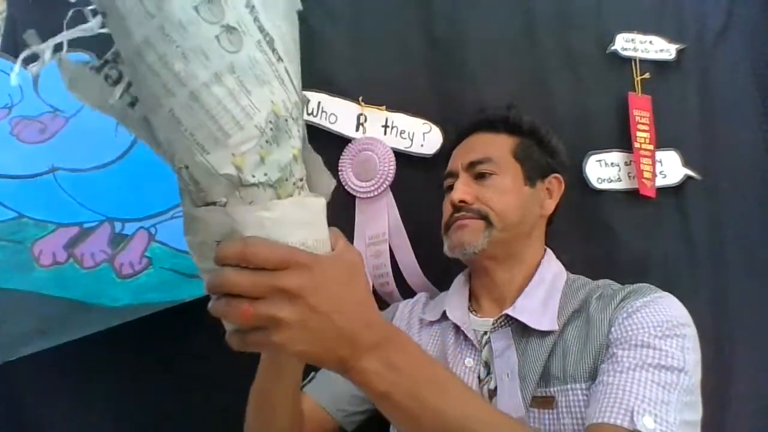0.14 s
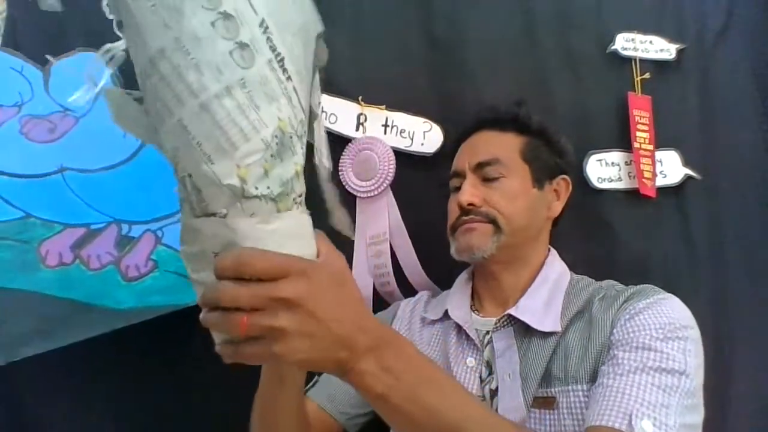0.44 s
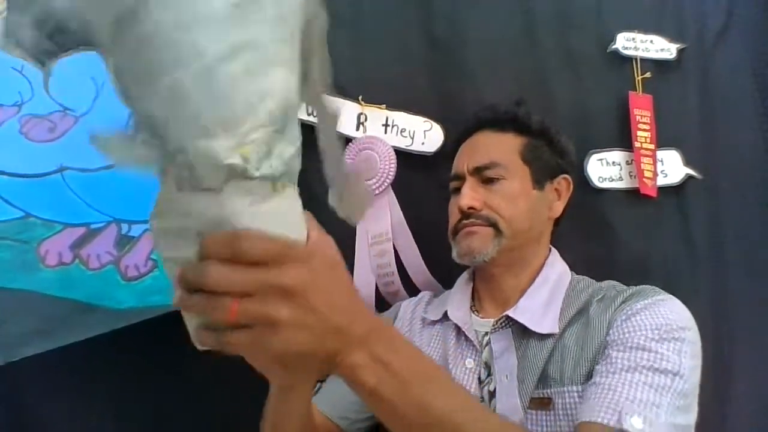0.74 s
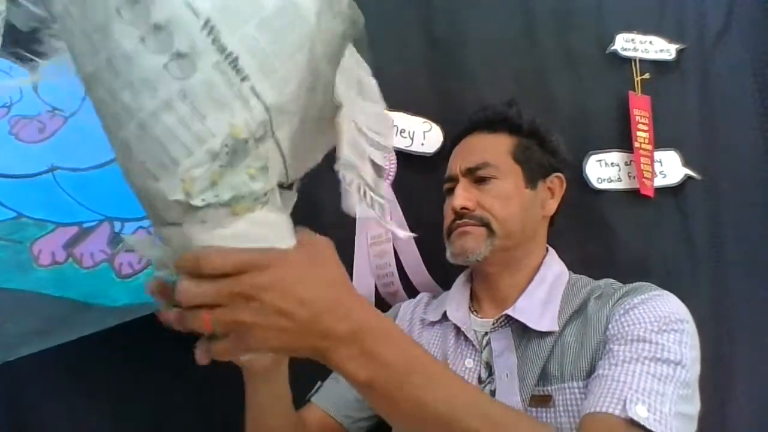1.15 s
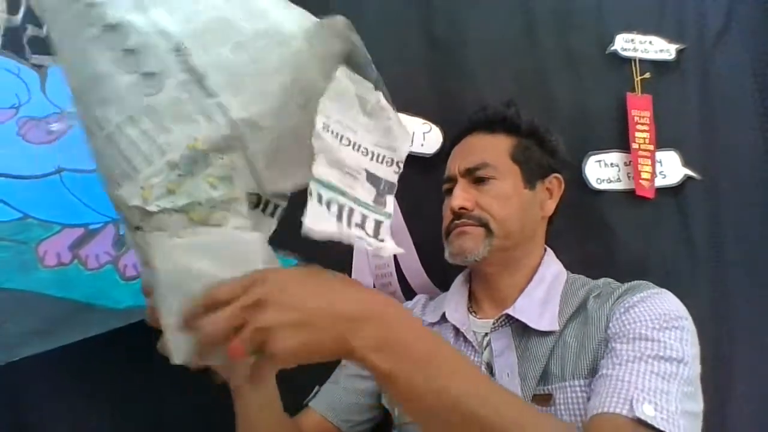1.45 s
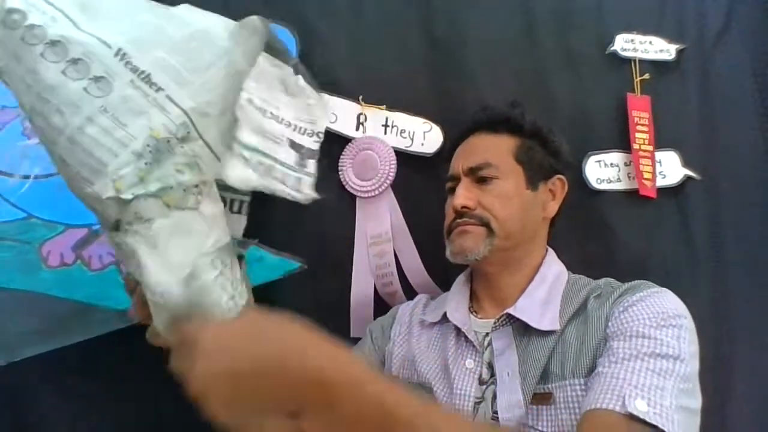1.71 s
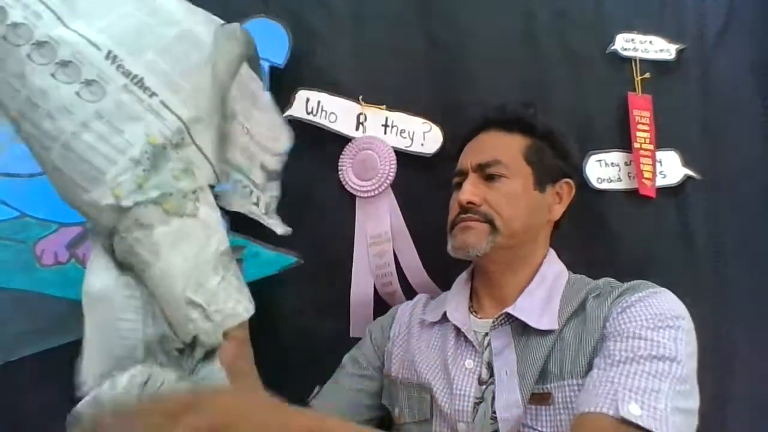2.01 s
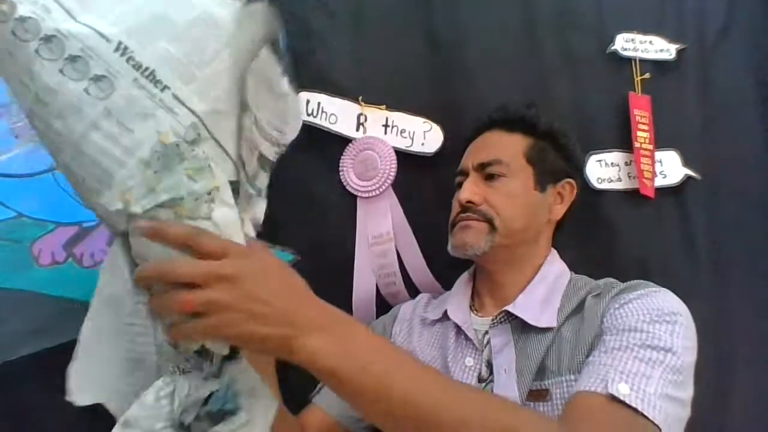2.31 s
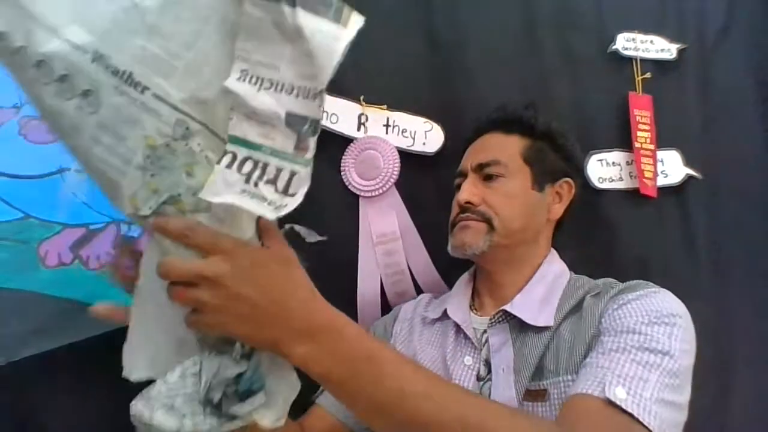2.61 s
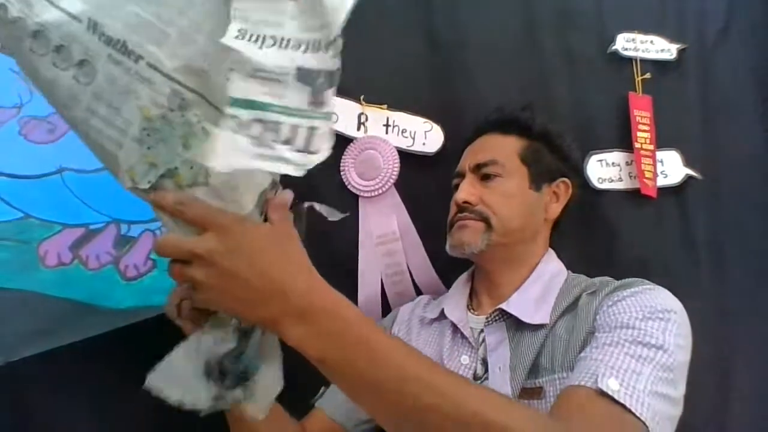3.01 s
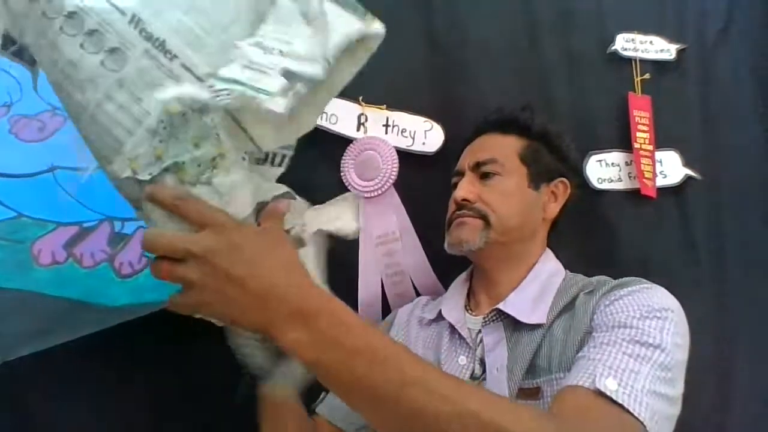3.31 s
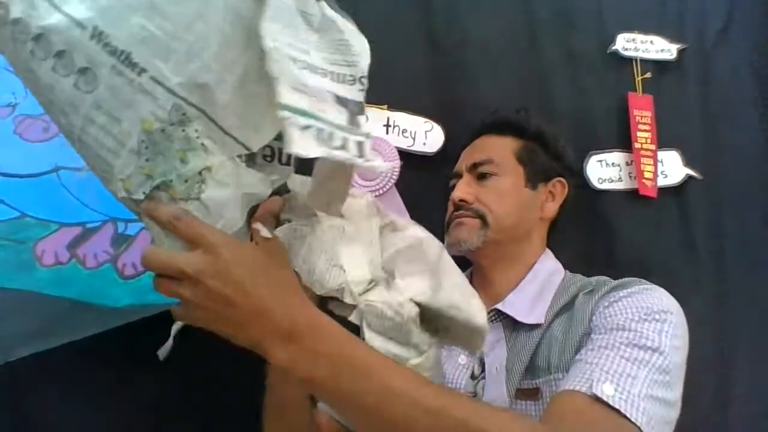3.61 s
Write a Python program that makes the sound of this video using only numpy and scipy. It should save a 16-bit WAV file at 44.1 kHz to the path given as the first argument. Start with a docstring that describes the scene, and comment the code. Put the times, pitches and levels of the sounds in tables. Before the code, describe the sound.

Newspaper is pulled and crumpled close to the microphone in uneven, crackly rustles indoors

```python
"""Newspaper is pulled off a plant and crumpled, close to a microphone in a small, dry room.
Each pull or squeeze drives a swarm of tiny noise grains, split into body, crackle and fizz.
Single large creases snap as short noise bursts with a ringing facet, and the paper cone knocks
hollowly as decaying sines. The swung sheet pushes one puff of low noise at the microphone,
over steady room noise."""
import sys
import numpy as np
from scipy import signal
from scipy.fft import rfft, irfft
from scipy.io import wavfile
from scipy.ndimage import map_coordinates

SR = 44100
rng = np.random.default_rng(int(sys.argv[2]) if len(sys.argv) > 2 else 0)


def wav_out(sig):
    """Save sig, one row per channel (or a flat mono array), as 16-bit PCM at SR to the path in sys.argv[1]."""
    wavfile.write(sys.argv[1], SR, np.round(np.clip(np.atleast_2d(sig).T, -1, 1) * 32767).astype(np.int16))


N = 165375

# Pulls and squeezes, with band levels ahead of the paper colour: (start [s], attack [s], hold [s],
# release per 20 dB [s], body level [dB], crackle level [dB], fizz level [dB])
STROKES = [(0, 0.0092, 0.143, 0.57, -46, -39.5, -37), (0.199, 0.0099, 0.0732, 0.19, -45.5, -34, -35),
           (0.33, 0.016, 0.016, 1.38, -51.5, -41.5, -41), (0.503, 0.021, 0.0437, 0.07, -36, -27, -28),
           (0.599, 0.0135, 0.0104, 0.02, -40.5, -34, -40.5), (0.646, 0.0067, 0.0814, 0.3186, -33, -23, -23),
           (0.761, 0.0207, 0.0133, 0.1074, -25.5, -28, -32),
           (0.839, 0.0157, 0.0326, 0.1587, -31, -23.5, -22.5),
           (0.944, 0.0242, 0.0228, 0.1, -35, -29, -32.5), (1.002, 0.058, 0.112, 0.522, -39, -32, -29),
           (1.189, 0.0122, 0.0135, 0.02, -36, -34.5, -28), (1.29, 0.061, 0.046, 0.11, -44, -33, -35.5),
           (1.43, 0.0333, 0.0737, 0.1312, -34, -23, -22), (1.586, 0.0176, 0.019, 0.34, -39.5, -27, -28.5),
           (1.662, 0.1493, 0.0441, 0.037, -30.5, -23.5, -19.5),
           (1.83, 0.0126, 0.0664, 0.075, -31, -29, -33.5),
           (1.896, 0.0192, 0.0436, 0.1364, -30.5, -31, -28.5),
           (1.959, 0.015, 0.0196, 0.14, -38, -30.5, -26), (2.02, 0.0106, 0.0143, 0.12, -43.5, -40.5, -40.5),
           (2.197, 0.052, 0.012, 0.5, -47, -43, -41), (2.264, 0.02, 0.018, 0.1521, -33, -30.5, -22.5),
           (2.303, 0.0195, 0.0173, 0.277, -34.5, -32, -34),
           (2.405, 0.0555, 0.0178, 0.126, -40.5, -32.5, -29),
           (2.552, 0.0175, 0.043, 0.2, -44.5, -41, -36.5), (2.604, 0.0072, 0.0158, 0.0833, -32, -26, -27),
           (2.736, 0.0125, 0.011, 0.16, -35.5, -34, -31), (2.814, 0.0093, 0.067, 0.135, -28, -22.5, -22),
           (2.918, 0.0337, 0.0066, 0.1336, -27, -23, -22), (3.038, 0.0383, 0.094, 0.1752, -32, -28.5, -26),
           (3.226, 0.036, 0.031, 0.1274, -36, -32.5, -29.5), (3.37, 0.0785, 0.031, 0.0041, -42, -34, -32),
           (3.438, 0.0175, 0.0076, 0.17, -37, -31, -26.5), (3.622, 0.051, 0.084, 0.94, -45, -37, -37)]
# Large creases snapping: (start [s], energy [dB], ring pitch [Hz], # ring share of energy [0-1], decay time
# constant [ms])
SNAPS = [ (.0404, -1.5, 14500, 0.25, 2.5), (.2059, -1, 784, 0.41, 2.3), (.211, -4.5, 1850, 0.51, 2.2),
         (0.2666, -9.5, 4000, .3, 0.93), (0.366, 2.5, 3610, 0.14, 1.52), (0.4508, -2, 14060, 0.67, 1.83),
         (0.511, -5.5, 12000, 0.23, 1.35), (.6212, -8.5, 2400, 0.5, 1.66), (.654, -2.5, 4000, 0.34, 2.44),
         (.661, 3.5, 3690, 0.42, 2.9), (0.68, 3, 3600, 0.13, 2.3), (.7479, 4, 3100, 0.29, 2.34),
         (.7874, 1.5, 1684, 0.94, 2.17), (.8067, 3, 598, 0.61, 1.8), (.907, 3.5, 5800, 0.55, 1.35),
         (0.9688, 1, 3310, 0.3, 1.52), (1.2049, 1.5, 14500, 0.3, 2.6), (1.2243, -1, 5500, 0.72, 1.96),
         (1.2589, -6, 11000, 0.28, 0.84), (1.4209, -2, 2240, 0.38, 1.2), (1.5126, 5.5, 14000, 0.21, 1.97),
         (1.5258, 9.5, 2210, 0.49, 1.26), (1.532, -5, 9000, 0.36, 0.87), (1.5353, 6, 14000, 0.3, 1.52),
         (1.5728, 7.5, 4960, 0.55, 1.4), (1.6159, -1, 12500, 0.24, 0.73), (1.6209, 1.5, 13500, 0.23, 0.97),
         (1.6482, 6.5, 9940, 0.85, 2.3), (1.6964, 0, 2460, 0.49, 1.6), (1.7353, 9, 12500, 0.35, 2.94),
         (1.7676, 2, 15000, 0.32, 0.92), (1.805, 12.5, 10900, 0.35, 2.1), (1.812, 7.5, 11600, 0.33, 1.76),
         (1.8484, 12.5, 9060, 0, 2.4), (1.8544, 10, 934, 0.54, 1.7), (1.9192, 5, 2690, 0.75, 1.32),
         (1.9267, 9.5, 3276, 0.44, 0.68), (1.9321, -1.5, 9000, 0.08, 0.74), (1.9418, 0, 6000, 0.47, 1.75),
         (2.1655, -5.5, 10400, 0.46, 3.54), (2.1743, -11, 4900, 0.72, 2.2), (2.2855, 1, 11000, 0.4, 2.1),
         (2.3185, 11, 5400, 0.53, 1.09), (2.3397, 1, 1700, 0.49, 1.4), (2.352, 7, 1810, 0.91, 1.6),
         (2.4099, -1, 11000, 0.43, 0.98), (2.4116, 2.5, 5020, 0.51, 2.6), (2.5562, -8, 12000, 0.42, 0.96),
         (2.616, 2, 1400, 0.53, 2), (2.6196, 3.5, 9500, 0.44, 0.76), (2.6333, 8, 3030, 0.65, 2.47),
         (2.7987, 0.5, 7600, 0.45, 1.5), (2.83, 14.5, 12600, 0.29, 2.9), (2.8445, 4.5, 11000, 0.3, 1.75),
         (2.8676, 4, 10300, 0.6, 1.65), (2.88, 7, 2880, 0.17, 3.5), (2.8895, 3, 4500, 0.42, 1.17),
         (2.9451, 3, 4200, .3, 1.45), (2.9567, 11.5, 3140, 0.04, 2.7), (2.9642, 9.5, 13000, 0.33, 2.2),
         (3.1156, 1, 2500, 0.29, 1.9), (3.1668, -6.5, 14600, 0.73, 2.2), (3.4612, 4.5, 2500, 0.28, 3.4),
         (3.6305, -12, 2300, 0.09, 2.04), (3.7053, -8.5, 6460, 0.54, 1.4)]
# Hollow knocks of the paper cone: (start [s], pitch [Hz], level before envelope [dB], T60 [s])
KNOCKS = [(.788, 517.7, -19, 0.078), (1.849, 1168, -18.5, 0.079), (1.852, 770.4, -18, 0.063),
          (1.9205, 542, -18.5, 0.037), (1.99, 130.4, -28.5, 0.093), (2.3879, 405, -18, 0.028),
          (2.46, 136.4, -31, 0.107), (2.758, 210.6, -24.5, 0.0535), (2.878, 130.7, -27.5, 0.07),
          (2.965, 311.5, -15.5, 0.0593), (2.991, 332.6, -20, 0.081), (3.015, 283.4, -22, 0.067),
          (3.519, 119, -36, 0.104)]
# Colour of the paper: (frequency [Hz], gain [dB])
PAPER_COLOUR = [(100, -1.5), (300, 0.5), (450, -3), (750, -3), (1100, -3.5), (1600, -3.5), (2600, -2.5),
                (4000, -3.5), (6500, -1.01), (10000, 0.31), (13000, 1.25), (15500, 3)]
# The held paper never quite rests: (body level [dB], crackle level [dB], fizz level [dB])
RESTLESS_DB = [-51, -46.5, -45.5]
# Spectral shape of the room noise: (frequency [Hz], relative level per Hz [dB])
ROOM_NOISE_COLOUR = [(20, 1.5), (45, -0.5), (100, -3), (200, -10.5), (400, -14.5), (1000, -20),
                     (4000, -25.5), (16000, -33)]

# Swarm of tiny creases; spreads are random deviations in dB
CREASES_PER_S, CREASE_SPREAD_DB, CREASE_DECAY_S = 2800, 5, 0.000569
RUB_DB, FLUTTER_DB, FLUTTER_PER_S = -2, 1.0, 110  # sheet rubs on sheet, unevenly
PATCHY_DB, PATCHES_PER_S = 2, 45  # resonances come and go as the sheet bends
# Middling creases; their level is relative to the swarm
TICKS_PER_S, TICK_DB, TICK_SPREAD_DB, TICK_DECAY_S = 130, -11, 4, 0.001365
TICK_LOW_HZ, TICK_HIGH_HZ, TICK_Q = 681, 14000, 2.67
BODY_LOW_HZ, BODY_TOP_HZ, CRACKLE_TOP_HZ = 260.6, 1241, 4946  # band edges
THUD_TOP_HZ, THUD_BASS_HZ, THUD_DB = 276, 89.3, -10.5  # level relative to the body
ROOM_NOISE_DB = -46
ROOM_T60_S, ROOM_TREBLE_T60_S, ROOM_SPLIT_HZ, ROOM_GAP_S = 0.31, 0.155, 4030, .004
ROOM_DB, ROOM_TREBLE_DB = -15.5, -19  # tail energy ahead of the band split
RING_Q, SNAP_RISE_S, SNAP_LOW_HZ = 4.96, 0.000096, 406
PUFF_S, PUFF_WIDTH_S, PUFF_DB, PUFF_HZ = 0.805, 0.083, -37.5, 100.4  # centre, sigma, level, cutoff
KNOCK_ATTACK_S = 0.00071
TOP_HZ = 15900


def undb(db):
    """Decibels to gain."""
    return 10 ** (np.asarray(db) / 20)


def unit(x):
    """Scale to rms 1."""
    return x / np.sqrt(np.mean(x ** 2) + 1e-20)


def norm(x):
    """Scale to energy 1."""
    return x / np.sqrt(np.sum(x ** 2) + 1e-20)


def cut(x, hz, kind, order=2):
    """Low-pass or high-pass."""
    return signal.sosfilt(signal.butter(order, hz, kind, fs=SR, output="sos"), x)


def soft(x, hz, kind, order=2):
    """The same filter forwards and backwards, so that bands add up without notches."""
    forwards = cut(x, hz, kind, order)
    return cut(forwards[::-1], hz, kind, order)[::-1]


def colour(x, points):
    """Shape the spectrum by (frequency [Hz], gain [dB]) points."""
    hz, db = np.array(points).T
    f = np.maximum(np.fft.rfftfreq(N, 1 / SR), 1)
    gain = undb(np.interp(np.log(f), np.log(hz), db))
    return irfft(rfft(x) * gain, N)


def walk(rate):
    """Random wander of rms 1, gliding through 'rate' new values a second."""
    position = np.arange(N) / SR * rate
    return unit(map_coordinates(rng.standard_normal(4096), [position], order=1, mode="wrap"))


def swarm(size=128):
    """Tiny creases of very uneven size buckle, no two alike, over the rub of sheet on sheet."""
    count = int(CREASES_PER_S * N / SR)
    places = rng.integers(0, N, count)[:, None] + np.arange(size)
    sizes = undb(CREASE_SPREAD_DB * np.minimum(rng.standard_normal((count, 1)), 2))
    decay = np.exp(-np.arange(size) / SR / CREASE_DECAY_S)
    grains = sizes * rng.standard_normal((count, size)) * decay
    creases = np.bincount(places.ravel(), grains.ravel(), N)[:N]
    rub = undb(RUB_DB) * rng.standard_normal(N)
    flutter = undb(FLUTTER_DB * walk(FLUTTER_PER_S))
    return unit((unit(creases) + rub) * flutter)


def bend(x, count=18):
    """The sheet changes shape, so its resonances come and go in overlapping bands."""
    log_hz = np.log(np.fft.rfftfreq(N, 1 / SR) + 1)
    place = np.interp(log_hz, np.log([200, 16000]), [0, count - 1])
    spectrum = rfft(x)
    out = np.zeros(N)
    for k in range(count):
        band = irfft(spectrum * np.maximum(1 - abs(place - k), 0), N)
        out += band * undb(PATCHY_DB * walk(PATCHES_PER_S))
    return unit(out)


def ticks():
    """Middling creases give way at random, each a resonant noise burst with its own pitch."""
    t, out = np.arange(SR // 100) / SR, np.zeros(N + SR)
    for when, pitch, size in rng.random((int(TICKS_PER_S * N / SR), 3)):
        hz = TICK_LOW_HZ * (TICK_HIGH_HZ / TICK_LOW_HZ) ** np.sqrt(pitch)  # high pitches favoured
        burst = rng.standard_normal(len(t)) * np.exp(-t / TICK_DECAY_S)
        tick = norm(signal.lfilter(*signal.iirpeak(hz, TICK_Q, fs=SR), burst))
        gain = undb(TICK_SPREAD_DB * min(-np.log(size), 3))  # many small, few large
        i = int(when * N)
        out[i:i + len(t)] += gain * tick
    return unit(out[:N])


def rustle():
    """Strokes drive the creases: broad folds give body, small ones crackle, finest fizz; a soft thud."""
    t = np.arange(N) / SR
    creases = bend(swarm()) + undb(TICK_DB) * ticks()
    thud = cut(rng.standard_normal(N), THUD_TOP_HZ, "low", order=4)
    thud = unit(cut(thud, THUD_BASS_HZ, "high"))
    body = soft(soft(creases, BODY_LOW_HZ, "high"), BODY_TOP_HZ, "low")
    crackle = soft(soft(creases, BODY_TOP_HZ, "high"), CRACKLE_TOP_HZ, "low")
    fizz = soft(creases, CRACKLE_TOP_HZ, "high")
    # overlapping strokes add as power, band by band
    power = undb(RESTLESS_DB)[:, None] ** 2 + np.zeros(N)
    for start, attack, hold, release, *db in STROKES:
        rise = np.clip((t - start) / attack, 0, 1)
        fall = np.exp(-np.log(10) * np.maximum(t - start - attack - hold, 0) / release)
        power += (undb(db)[:, None] * rise * fall) ** 2
    bands = unit(body) + undb(THUD_DB) * thud, unit(crackle), unit(fizz)
    return sum(np.sqrt(p) * band for p, band in zip(power, bands))


def room_noise():
    """Steady noise of the room, strongest in the bass."""
    return undb(ROOM_NOISE_DB) * unit(colour(rng.standard_normal(N), ROOM_NOISE_COLOUR))


def room(x):
    """Add a short noise tail whose treble dies first."""
    t = np.arange(SR // 2) / SR
    low, high = rng.standard_normal((2, len(t))) * (t > ROOM_GAP_S)
    low = norm(low * np.exp(-np.log(1000) * t / ROOM_T60_S))
    high = norm(high * np.exp(-np.log(1000) * t / ROOM_TREBLE_T60_S))
    low = undb(ROOM_DB) * cut(low, ROOM_SPLIT_HZ, "low")
    high = undb(ROOM_TREBLE_DB) * cut(high, ROOM_SPLIT_HZ, "high")
    return x + signal.fftconvolve(x, low + high)[:N]


def snaps():
    """A large crease gives way in a burst of a few ms that rings the facet beside it."""
    t, out = np.arange(SR // 25) / SR, np.zeros(N + SR)
    for start, db, hz, share, decay_ms in SNAPS:
        shape = (1 - np.exp(-t / SNAP_RISE_S)) * np.exp(-t * 1000 / decay_ms)
        crack, push = rng.standard_normal((2, len(t))) * shape
        crack = cut(cut(crack, SNAP_LOW_HZ, "high"), TOP_HZ, "low", order=6)
        ring = signal.lfilter(*signal.iirpeak(hz, RING_Q, fs=SR), push)
        snap = np.sqrt(1 - share) * norm(crack) + np.sqrt(share) * norm(ring)
        i = int(start * SR)
        out[i:i + len(t)] += undb(db) * norm(snap)
    return out[:N]


def puff():
    """The swung sheet pushes air at the microphone: low noise that swells and fades once."""
    swing = np.exp(-((np.arange(N) / SR - PUFF_S) / PUFF_WIDTH_S) ** 2 / 2)
    return undb(PUFF_DB) * unit(cut(rng.standard_normal(N), PUFF_HZ, "low")) * swing


def knocks():
    """A whole panel of the cone flips and rings briefly as a decaying sine."""
    out = np.zeros(N)
    for start, hz, db, t60 in KNOCKS:
        t = np.maximum(np.arange(N) / SR - start, 0)
        shape = (1 - np.exp(-t / KNOCK_ATTACK_S)) * np.exp(-np.log(1000) * t / t60)
        out += undb(db) * np.sin(2 * np.pi * hz * t) * shape
    return out


def scene():
    """Paper and room, picked up by one microphone and sent to both channels."""
    paper = colour(rustle(), PAPER_COLOUR) + snaps() + knocks()
    mono = room(paper) + room_noise() + puff()
    return np.array([mono, mono])


def record(dry):
    """The recorder clips at full scale, then cuts the top steeply."""
    low_pass = signal.ellip(10, .2, 70, TOP_HZ, fs=SR, output="sos")
    return signal.sosfilt(low_pass, np.clip(dry, -1, 1))


dry = scene()
out = record(dry)
wav_out(out)
```